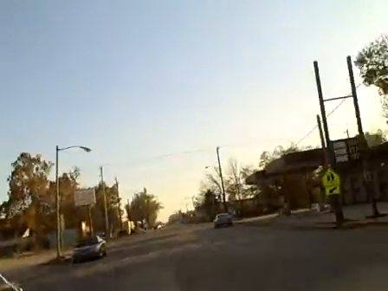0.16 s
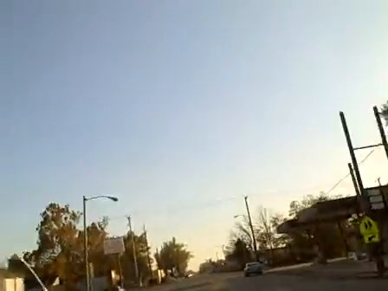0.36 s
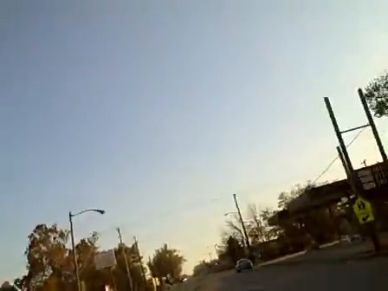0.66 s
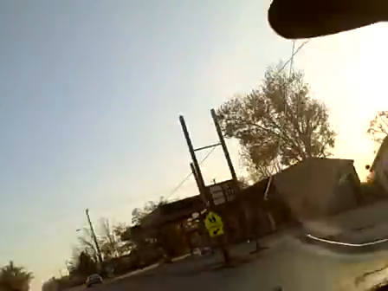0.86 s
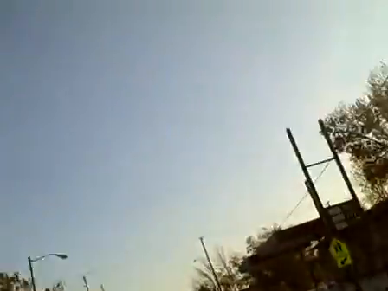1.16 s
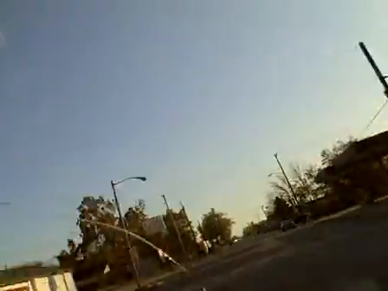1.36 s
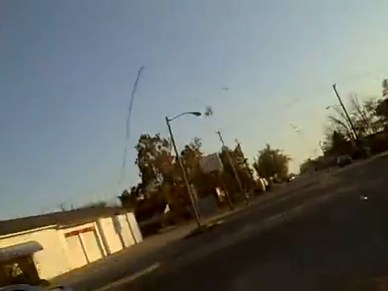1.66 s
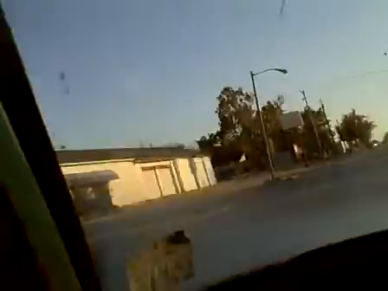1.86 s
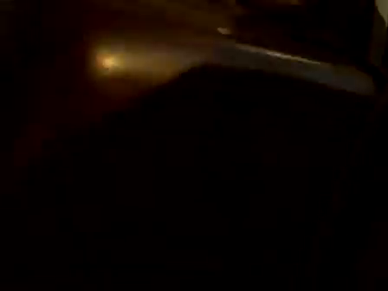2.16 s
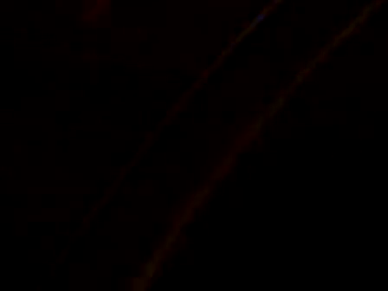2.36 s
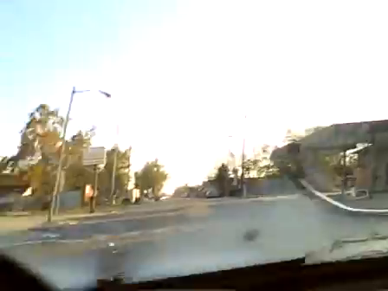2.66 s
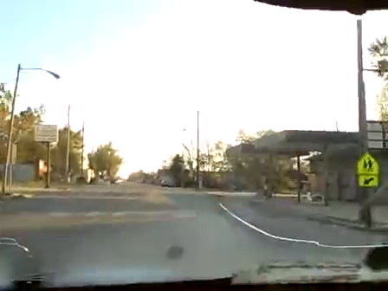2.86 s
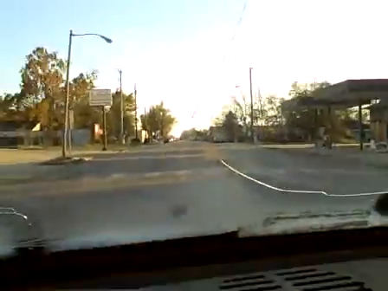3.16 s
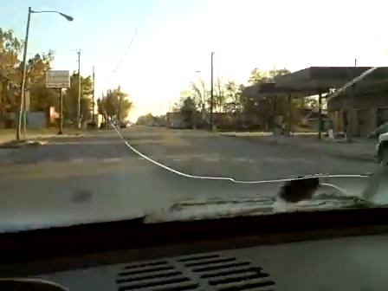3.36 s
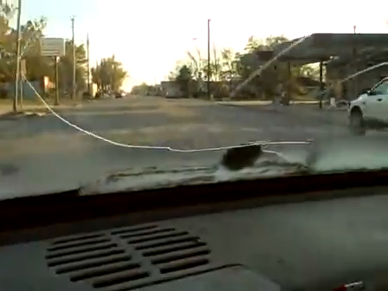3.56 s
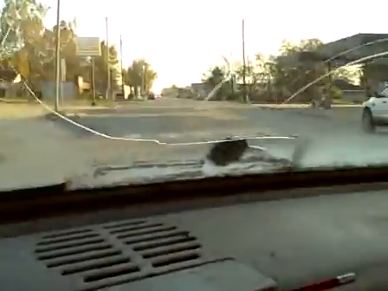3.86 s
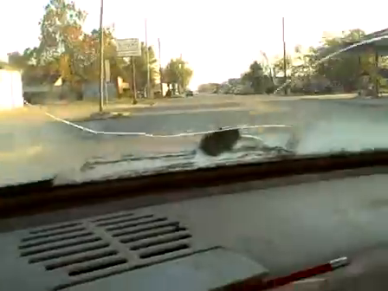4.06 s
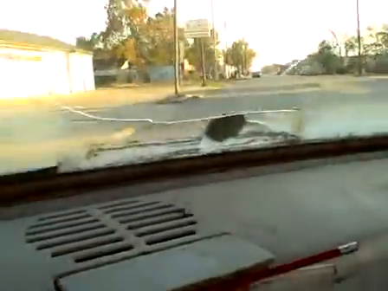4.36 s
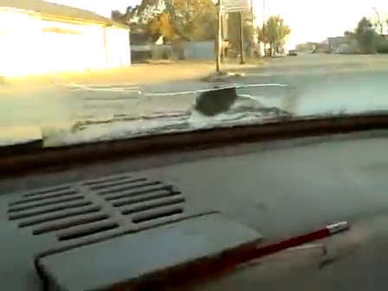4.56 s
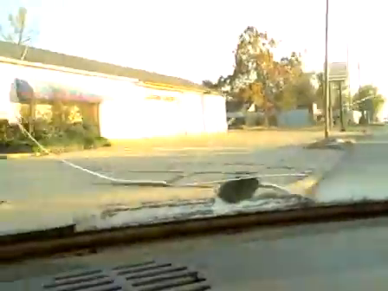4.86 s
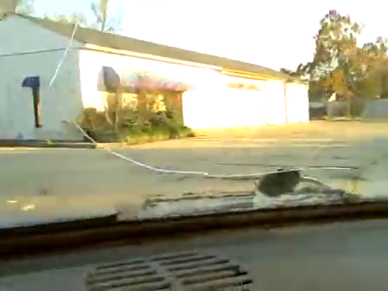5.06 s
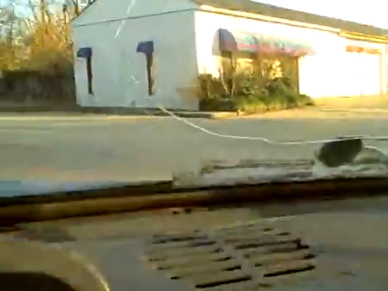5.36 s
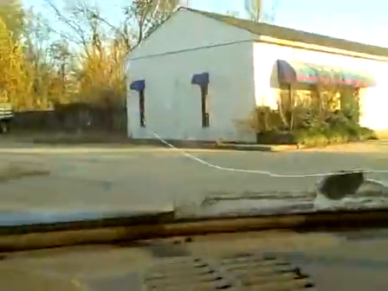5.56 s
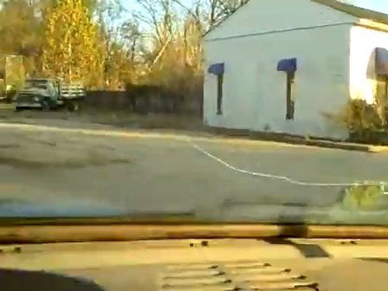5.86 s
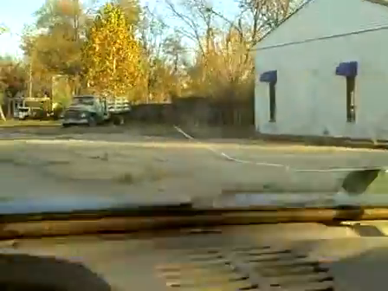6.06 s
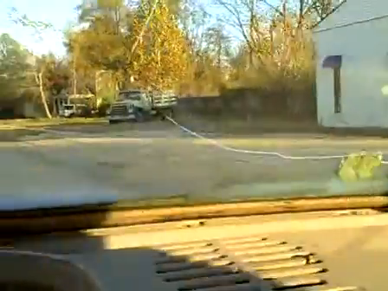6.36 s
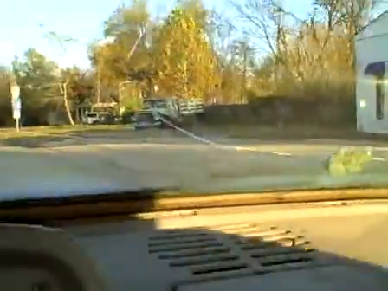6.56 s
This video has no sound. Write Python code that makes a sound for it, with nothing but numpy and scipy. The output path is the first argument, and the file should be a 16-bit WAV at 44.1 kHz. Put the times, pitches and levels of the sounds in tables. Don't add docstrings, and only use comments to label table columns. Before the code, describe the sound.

Inside an old truck cab, a lumpy idle with ticking trim, a vehicle whooshes past, then the engine pulls away droning over clattering bumps.

```python
import sys
import numpy as np
from scipy import signal
from scipy.io import wavfile

SR = 44100
rng = np.random.default_rng(int(sys.argv[2]) if len(sys.argv) > 2 else 0)


def ratio(d):
    e = np.asarray(d, float) / 20
    return 10 ** e


def dump_mix(stems):
    frames = np.atleast_2d(stems).T
    limited = np.clip(frames, -1, 1)
    pcm = np.round(limited * 32767).astype(np.int16)
    wavfile.write(sys.argv[1], SR, pcm)


N = 295911

# time in seconds, cylinder firings per second in Hz, firing tone level in dB (the throttle).
ENGINE_SPEED = [(0, 46.58, -23.5), (.7, 45.07, -23), (1, 43.14, -20), (1.22, 45.57, -14), (1.45, 48, -23),
                (1.7, 48.07, -20), (2.04, 50.56, -20), (2.41, 55.49, -13.5), (2.75, 73.06, -12.5),
                (2.95, 76.37, -16), (3.4, 70.9, -14.5), (4.0, 80.1, -15), (4.25, 83.24, -18),
                (4.7, 87.9, -17.5), (5.55, 96, -9), (5.75, 97.9, -14), (6, 99.78, -10.5),
                (6.71, 115.2, -12.5)]


def rms_one(x):
    return x / np.sqrt(np.mean(x ** 2) + 1e-20)


def in_time(rows):
    s, *columns = np.transpose(rows)
    return [np.interp(np.arange(N) / SR, s, column) for column in columns]


def at_hz(points, hz):
    table_hz, table_db = np.array(points).T
    return np.interp(np.log(hz), np.log(table_hz), table_db)


def drift(rate_hz):
    r = np.exp(-80 * np.pi * rate_hz / SR)
    noise = rng.standard_normal(N // 40 + 4002)
    slow = signal.lfilter([1], [1, -2 * r, r * r], noise)[4000:]
    return np.interp(np.arange(N) / 40, np.arange(len(slow)), rms_one(slow))


def resonate(x, hz, width_hz):
    r = np.exp(-np.pi * width_hz / SR)
    top = np.array([1, 0, -1]) * (1 - r * r) / 2
    return signal.lfilter(top, [1, -2 * r * np.cos(2 * np.pi * hz / SR), r * r], x)


def coloured(spectrum, sources, patchy_db):
    lowest_hz, highest_hz = spectrum[0][0], spectrum[-1][0]
    edges = lowest_hz * 2 ** np.arange(0, np.log2(highest_hz / lowest_hz) + .01, 1 / 3)
    out = 0
    for k, (low, high) in enumerate(zip(edges, edges[1:])):
        sos = signal.butter(2, [low, high], "band", fs=SR, output="sos")
        band = signal.sosfilt(sos, sources[k % 2])
        level_db = at_hz(spectrum, np.sqrt(low * high))
        out = out + band * ratio(level_db + patchy_db * drift(6.8))
    return rms_one(out)


def add(out, s, sound):
    i = round(s * SR)
    out[i:i + len(sound)] += sound[:N - i]


def rumble_roar_and_buzz(cycle):
    # frequency in Hz, level in dB per Hz.
    rumble_spectrum = [(12, -12), (20, -2), (43, 0), (60, -8), (85, -11), (140, -12), (200, -12),
                       (250, -23), (330, -28), (420, -35), (560, -46)]
    roar_spectrum = [(160, -4), (280, -5.5), (394, -0.5), (480, -4.5), (787, -1.5), (934, -2.5), (1340, -6),
                     (1660, -17.5), (2400, -23), (3120, -37), (5280, -120)]
    buzz_spectrum = [(1900, -15.5), (2300, -4.5), (3100, 1.5), (4000, -2.5), (4800, 1.5), (5600, -2.5),
                     (6500, -5.5), (7300, -3), (8200, -14), (9500, -20)]
    # time in seconds, strength in dB.
    body_shaking = [(0, 0.5), (.2, -1), (1.0, -0.5), (1.4, 1.5), (2.15, 3), (2.7, 0.5), (2.9, -0.5),
                    (3.5, -1), (4.2, 0), (4.45, 0.5), (5.5, 1), (6.2, -.5), (6.5, 6), (6.71, 2)]

    octaves = np.log2(in_time(ENGINE_SPEED)[0] / ENGINE_SPEED[0][1])
    shaking_db, = in_time(body_shaking)
    rumble_db = -29.5 + 6 * octaves + 1.04 * shaking_db
    roar_db = -37.5 + 3.12 * octaves + 1.06 * shaking_db
    buzz_db = -44 + 10.87 * octaves + 0.35 * shaking_db

    rumble = coloured(rumble_spectrum, rng.standard_normal((2, N)), patchy_db=0.5)
    roar = coloured(roar_spectrum, rng.standard_normal((2, N)), patchy_db=1.92)
    grain = ratio(0.5 * np.cos(8 * cycle) + 0.73 * drift(42) + 1.42 * drift(31))
    buzz = coloured(buzz_spectrum, rng.standard_normal((2, N)) * grain, patchy_db=0.54)
    return ratio(rumble_db + 5.5) * rumble + ratio(roar_db) * roar + ratio(buzz_db - 5.5) * buzz


def passing_vehicle():
    # time in seconds, motor pitch in Hz, second harmonic in dB (throttle), tyres in dB (nearness).
    drive_by = [
        (0, 124.7, -40.5, -70),
        (.62, 118.9, -45, -65),
        (.78, 117.5, -34, -43.5),
        (1.27, 113, -29.5, -47),
        (1.4, 111.7, -33, -38.5),
        (1.6, 110, -29.5, -39),
        (1.9, 109.1, -44.5, -37.5),
        (2.1, 103, -59, -35.5),
        (2.5, 99, -66, -44),
    ]
    # tread resonance in Hz, its width in Hz, level in dB.
    tread = [(600, 200, -25.5), (800, 75, 4), (946, 110, 14), (1235, 120, 9.5), (1600, 300, -23)]
    full_throttle_db = -29

    hz, second_db, tyre_db = in_time(drive_by)
    third_db = -37.5 + 4 * (second_db - full_throttle_db)
    turn = 2 * np.pi * np.cumsum(hz) / SR
    motor = ratio(second_db + 3) * np.sin(2 * turn) + ratio(third_db + 3) * np.sin(3 * turn)
    motor = motor * ratio(3 * drift(6.4))

    air = rng.standard_normal(N)
    tyre = np.zeros(N)
    for tread_hz, width_hz, db in tread:
        ringing = rms_one(resonate(air, tread_hz, width_hz))
        tyre += ratio(db) * ringing * ratio(2 * drift(4.7))
    return motor + ratio(tyre_db) * rms_one(tyre)


def whines():
    # start in seconds, level in dB, first pitch in Hz, last pitch in Hz, length in seconds.
    whine_rows = [(1.003, -37.5, 850, 912, 0.39), (1.53, -32, 1010, 1008, 0.34),
                  (1.495, -42, 1500, 1450, 0.39), (1.59, -47, 1705, 1744, 0.26),
                  (1.774, -34, 1250, 1183, 0.26), (1.879, -34, 790, 800, 0.27), (1.899, -36, 540, 562, .3),
                  (1.974, -37, 1020, 1043, 0.13), (2.081, -34, 990, 920, .4), (2.101, -35, 1060, 1110, .38),
                  (2.619, -39.5, 1330, 1330, 0.83), (3.797, -43.5, 800, 800, 0.93)]
    rough_db, clear_db = -42, -24.5

    out, waver = np.zeros(N), drift(27)
    breakup = 1.3 * np.tanh(drift(130))
    for s, db, first_hz, last_hz, length in whine_rows:
        count, i = round(length * SR), round(s * SR)
        hz = np.linspace(first_hz, last_hz, count) + 18 * waver[i:i + count]
        rough = np.interp(db, [rough_db, clear_db], [1, 0])
        strength = 1 - rough + rough * breakup[-i - count:-i]
        tone = np.sin(2 * np.pi * np.cumsum(hz) / SR)
        add(out, s, ratio(db + 6) * strength * np.hanning(count) ** .5 * tone)
    return out


def rattles():
    # start in seconds, peak level in dB.
    idle_ticks = [(.07, -37), (0.185, -32), (.246, -34), (0.322, -33.5), (.354, -32), (0.435, -27.5),
                  (0.534, -28), (.619, -36), (.801, -27.5), (0.904, -25.5), (.983, -28.5), (1.086, -23),
                  (1.159, -30), (1.266, -35), (1.614, -30), (1.625, -23.5), (1.849, -29), (2.1244, -27.5)]
    # start in seconds, peak level in dB, dull part in dB.
    clatters = [(2.523, -24, -18), (2.577, -18.5, -3.5), (2.645, -20.5, -6), (2.6831, -19, -2),
                (3.327, -29, -1), (3.4468, -26.5, -19), (3.532, -31, -16), (3.8475, -25.5, -21),
                (5.311, -15.5, -4.5), (5.322, -6, -9.5), (5.331, -10, 0), (5.36, -18.5, -7),
                (5.609, -18.5, 9), (5.635, -24.5, 10.5), (5.6698, -19, 0), (5.825, -20, -5),
                (5.917, -21.5, -4), (6.1795, -15.5, -15), (6.5022, -8, -6), (6.5134, -12, -6.5),
                (6.524, -17.5, -8), (6.5584, 0.5, -6.5), (6.585, -15, -2.5), (6.6122, -12.5, -3.5),
                (6.645, -30, -9)]
    tick_s, clatter_s = 0.022, 0.017

    rows = [(s, db, tick_s, -5) for s, db in idle_ticks]
    rows += [(s, db, clatter_s, dull_db) for s, db, dull_db in clatters]
    for k in range(7):
        rows.append((6.043 + 0.028 * k, -15 - abs(k - 3), tick_s, -13))

    bright, dull = np.zeros(N), np.zeros(N)
    count = SR // 6
    t = np.arange(count) / SR
    for s, db, length, dull_db in rows:
        contacts = ratio(4.2 * rng.standard_normal(count))
        spray = rng.standard_normal((2, count)) * contacts
        shape = ratio(db) * (1 - np.exp(-t / 0.00067)) * np.exp(-t / length)
        add(bright, s, shape * spray[0])
        add(dull, s, ratio(dull_db) * shape * spray[1])
    bright = signal.sosfilt(signal.butter(2, [3400, 7500], "band", fs=SR, output="sos"), bright)
    dull = resonate(resonate(dull, 630, 1200), 650, 1500)
    return ratio(-8) * bright + ratio(1.5) * dull


def groans():
    # start in seconds, peak level in dB, pitch in Hz, length in seconds.
    groan_rows = [(1.05, -26.5, 194.5, 0.17), (1.45, -20, 93.6, 0.28), (1.819, -20, 149.8, .25),
                  (2.076, -43, 41.4, 0.22), (2.331, -31.5, 292.2, 0.17), (2.429, -42, 3220, 0.039),
                  (2.448, -10, 43.3, 0.27), (2.423, -11.5, 33.18, 1), (4.899, -14, 70.33, .45),
                  (6.304, -12, 36.05, 0.66), (1.3, -22.5, 143, 0.31), (1.952, -36, 248, 0.34),
                  (6.419, -6, 55.27, 0.23)]
    out = np.zeros(N)
    for s, db, hz, length in groan_rows:
        count = round(length * SR)
        tone = np.sin(2 * np.pi * hz * np.arange(count) / SR)
        add(out, s, ratio(db) * np.hanning(count) ** .5 * tone)
    return out


def knocks():
    # start in seconds, peak level in dB, pitch in Hz, time to fade by 60 dB in seconds.
    knock_rows = [(1.05, -21.5, 730, 0.048), (1.507, -10.5, 960, 0.03), (1.507, -25.5, 3060, 0.02),
                  (1.506, -25.5, 4920, 0.022), (1.507, -34, 4100, 0.034), (1.507, -36, 7100, .03),
                  (2.522, -27.5, 5820, 0.036), (1.935, -19.5, 608, 0.065), (2.027, -19.5, 3070, 0.013),
                  (2.579, -19.5, 752, 0.071), (2.651, -19, 1090, 0.068), (5.609, -18.5, 996, 0.19),
                  (5.609, -33, 1860, 0.07), (5.609, -32, 2190, 0.055), (5.325, -12, 164.8, .35),
                  (5.326, -15.5, 211, 0.5), (5.325, -17, 307, 0.44), (5.61, -23.5, 741, 0.3),
                  (5.608, -24, 1345, 0.16), (6.508, -23.5, 915, 0.093), (6.561, -17, 800, 0.045),
                  (6.44, -20, 330, .3), (6.47, -21.5, 521, .2)]
    out, t = np.zeros(N), np.arange(SR // 3) / SR
    for s, db, hz, t60 in knock_rows:
        pair = np.sin(2 * np.pi * hz * t) + 0.38 * np.sin(2 * np.pi * hz * 1.14 * t)
        add(out, s, ratio(db - 3 - 60 * t / t60) * pair)
    return out


def jolts():
    # start in seconds, peak level in dB, first pitch in Hz, last pitch in Hz, length in seconds.
    jolt_rows = [
        (2.594, -1, 54, 44, .046),
        (6.453, 5, 78, 20, .064),
        (6.524, -5, 25, 24, .125),
    ]
    out = np.zeros(N)
    for s, db, first_hz, last_hz, length in jolt_rows:
        part = np.arange(round(length * SR)) / (length * SR)
        hz = first_hz * (last_hz / first_hz) ** part
        swell = np.sin(np.pi * part ** 1.2) ** .7
        add(out, s, ratio(db) * swell * np.sin(2 * np.pi * np.cumsum(hz) / SR))
    return out


def engine():
    # multiple of the cycle rate, level in dB.
    cycle_tones = [(2, -5), (3, -11), (4, -4), (5, -6), (6, -8), (7, -13), (9, -11), (10, -1), (11, -8),
                   (12, -17), (13, -11), (14, -14), (15, -17), (16, -6), (17, -19), (18, -14), (19, -13),
                   (20, -18), (21, -16), (22, -21), (24, -12), (32, -13)]
    # frequency in Hz, level in dB.
    cab_boom = [(15, -11), (25, -0.5), (33, 0), (46, -0.5), (60, -3), (72, 1), (85, 0.5), (100, 4),
                (115, -5.5), (130, -10), (150, -2.5), (180, 0.5), (210, -8.5), (260, -18)]
    idle_hz, in_gear_hz = 50, 61
    lope_ends_hz, lope_depth = 54.6, 0.6

    firing_hz, firing_db = in_time(ENGINE_SPEED)
    uneven_db = np.interp(firing_hz, [idle_hz, in_gear_hz], [-24.5, -18])
    cycle = 2 * np.pi * np.cumsum(firing_hz) / SR / 8
    firing_tone = np.sin(8 * cycle + .15 * drift(4))
    out = np.sqrt(2) * ratio(firing_db + 1.6 * drift(9)) * firing_tone
    lope = lope_depth * np.clip((lope_ends_hz - firing_hz) / 10, 0, 1)
    out *= 1 + lope * np.cos(cycle + drift(0.32))

    for multiple, level_db in cycle_tones:
        tone_hz = firing_hz[::64] * multiple / 8
        boom_db = at_hz(cab_boom, tone_hz).repeat(64)[:N]
        wander = .4 * drift(1.2) + rng.uniform(0, 2 * np.pi)
        strength = ratio(uneven_db + level_db + boom_db + 2 * drift(3.0))
        out += strength * np.sin(multiple * cycle + wander)
    return out, cycle


def scene():
    drone, cycle = engine()
    background = rumble_roar_and_buzz(cycle) + passing_vehicle() + whines()
    body = rattles() + groans() + knocks() + jolts()
    return (background + body + drone)[None]


def top_cut(x):
    return signal.sosfilt(signal.butter(12, 16510, fs=SR, output="sos"), x)


def record(dry):
    clip_top, clip_bottom = .74, -.705
    fade_out_s = .012
    heard = dry + ratio(8) * resonate(dry, 5520, 603)
    heard = np.clip(heard, clip_bottom, clip_top)
    heard = signal.sosfilt(signal.butter(8, 7420, fs=SR, output="sos"), heard)
    heard = signal.sosfilt(signal.cheby2(12, 60, 10000, fs=SR, output="sos"), heard)
    heard = heard * np.clip(np.arange(N)[::-1] / SR / fade_out_s, 0, 1)
    heard = np.clip(heard, 1.01 * clip_bottom, 1.012 * clip_top)
    return top_cut(heard)


dry = scene()
out = record(dry)
dump_mix(out)
```